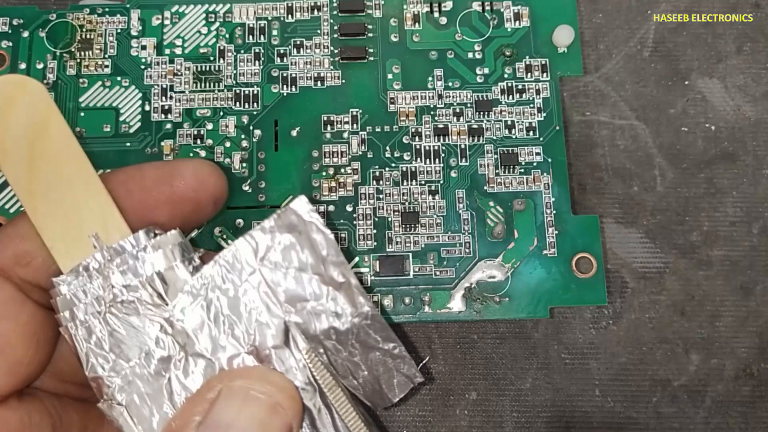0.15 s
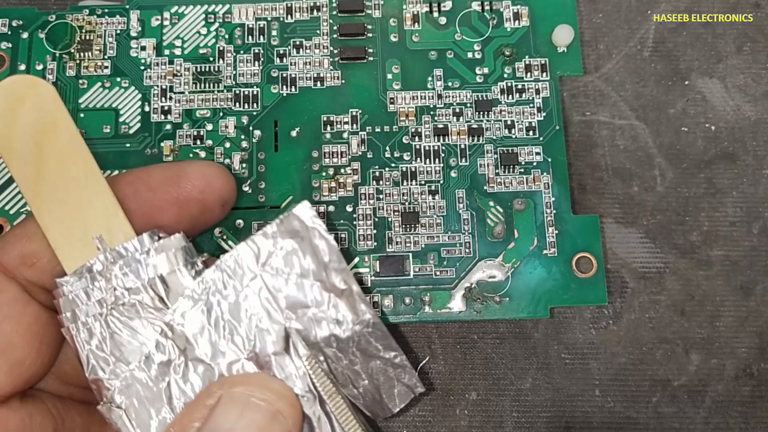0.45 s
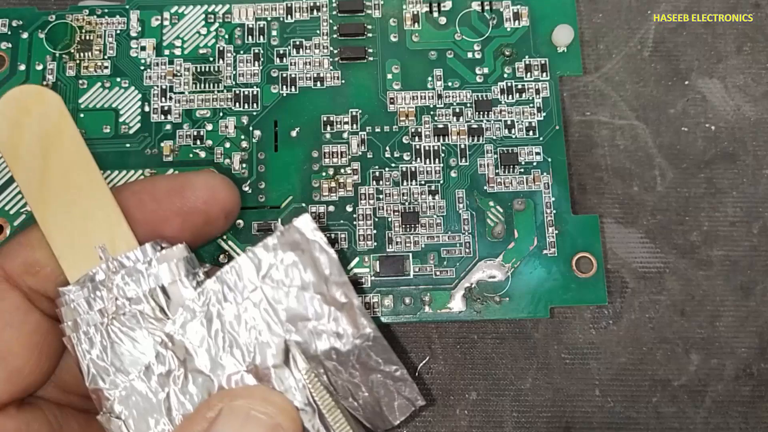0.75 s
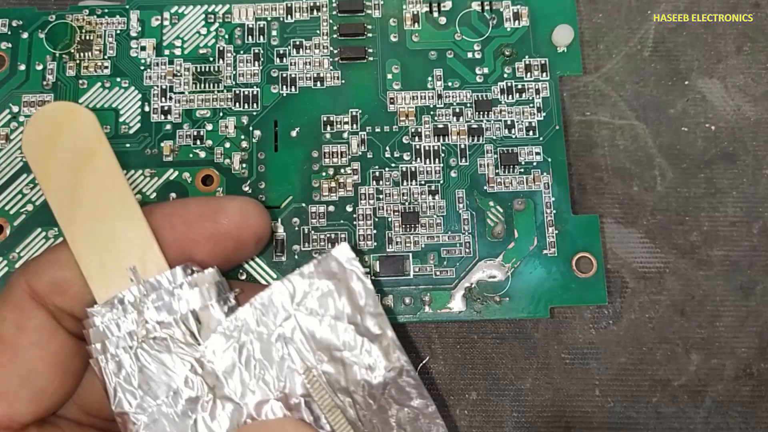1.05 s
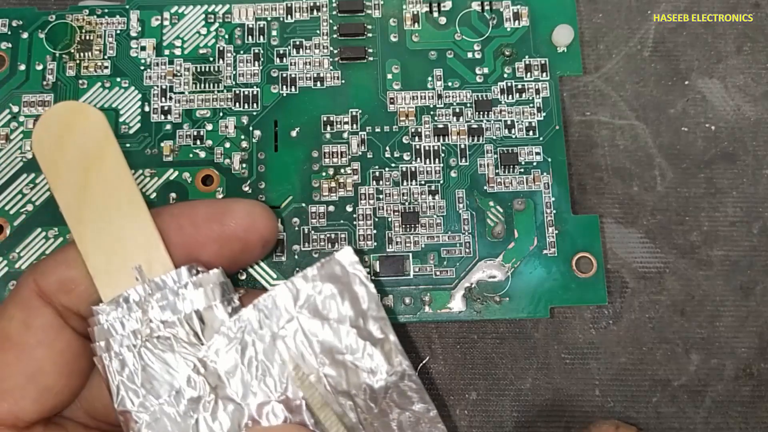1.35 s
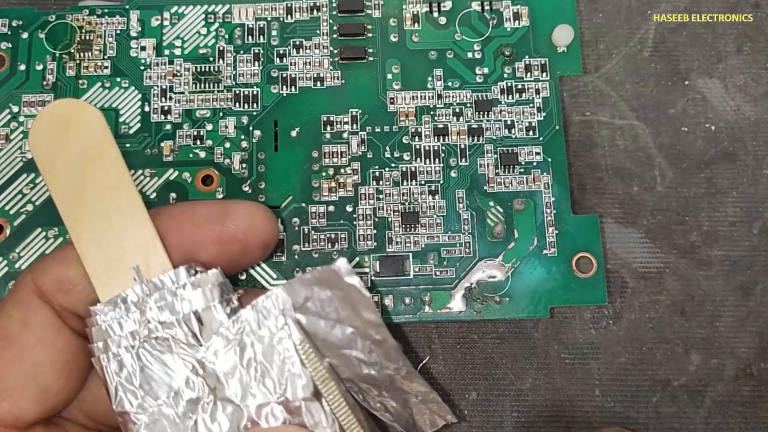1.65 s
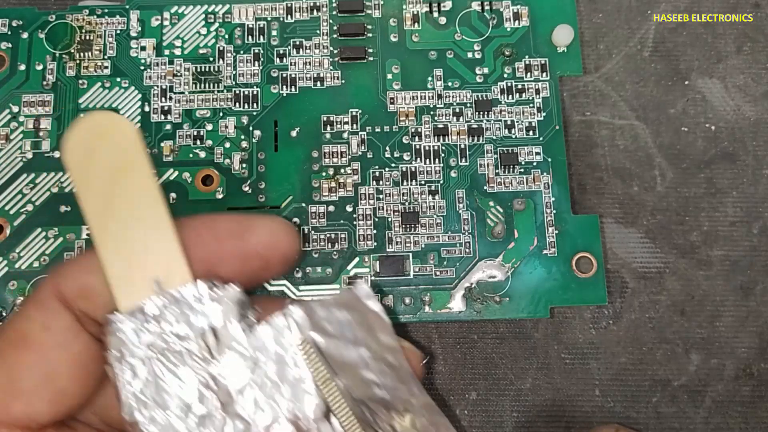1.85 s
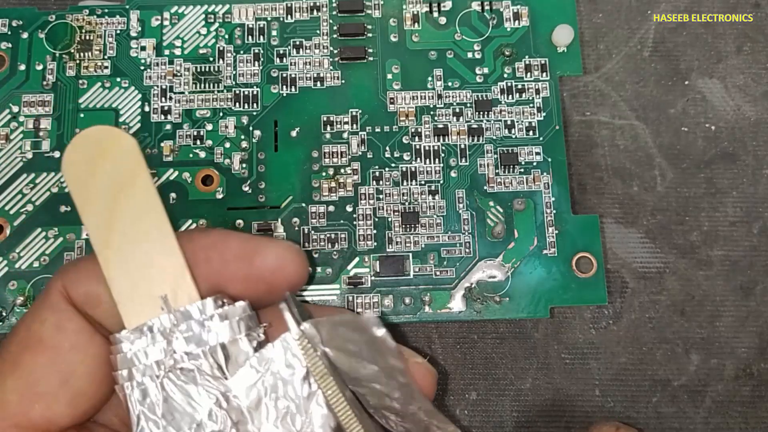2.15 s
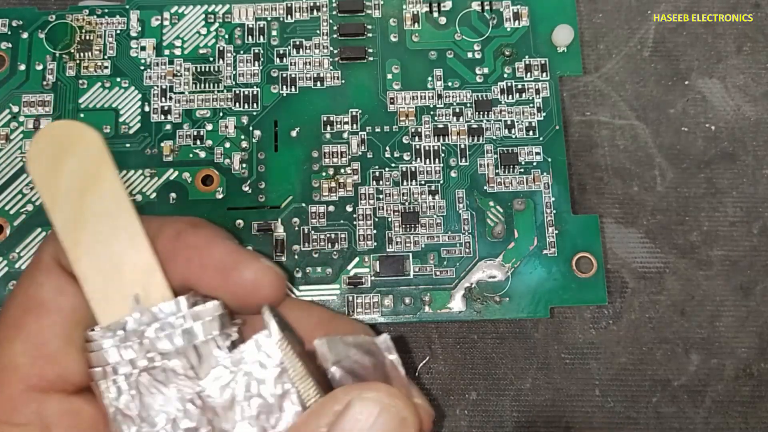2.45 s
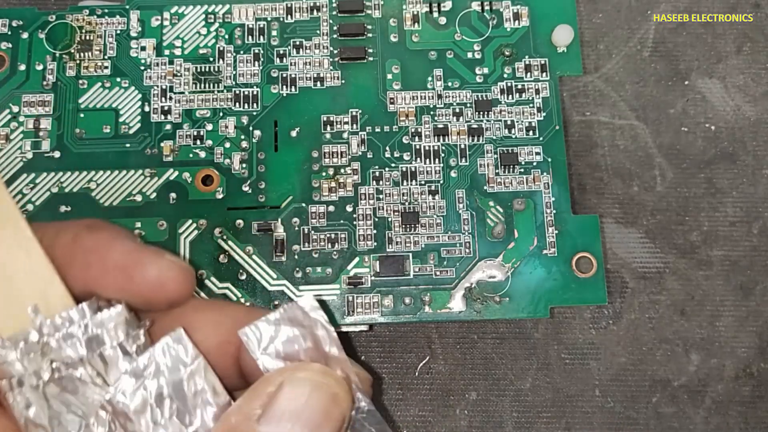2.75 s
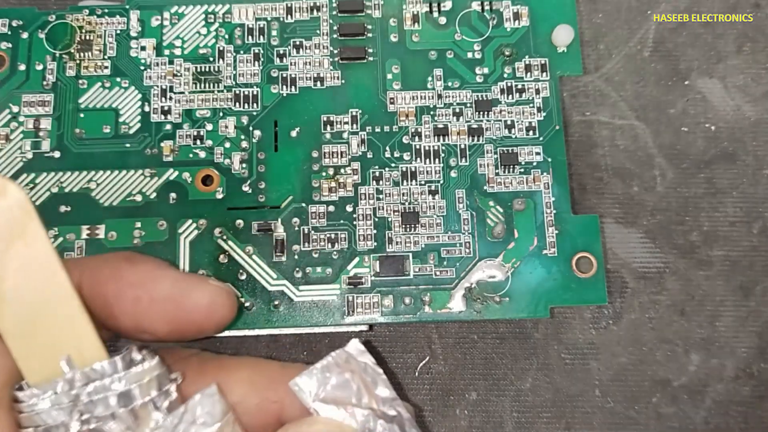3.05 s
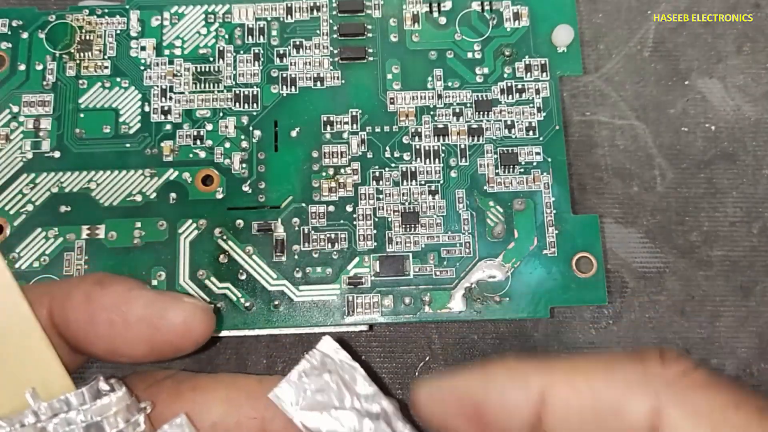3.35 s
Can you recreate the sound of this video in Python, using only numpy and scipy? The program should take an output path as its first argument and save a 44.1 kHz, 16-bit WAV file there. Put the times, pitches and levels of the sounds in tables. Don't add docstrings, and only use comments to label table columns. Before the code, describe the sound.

Crumpled foil crackles sharply as scissors cut it, then the scissors clatter onto the bench.

```python
import sys
import numpy as np
from scipy import signal
from scipy.fft import rfft, irfft, next_fast_len
from scipy.io import wavfile
from scipy.ndimage import uniform_filter1d, map_coordinates

SR = 44100
rng = np.random.default_rng(int(sys.argv[2]) if len(sys.argv) > 2 else 0)


def level_to_linear(level):
    exponent = np.asarray(level, float) / 20
    return 10 ** exponent


def wav_out(sig):
    wavfile.write(sys.argv[1], SR, np.round(np.clip(np.atleast_2d(sig).T, -1, 1) * 32767).astype(np.int16))


N = 154350
T = np.arange(SR // 4) / SR

# (frequency [Hz], density [dB per Hz])
FOIL_SPECTRUM = [(250, -48), (700, -2), (1100, -5), (2200, -3.5), (4000, -4.5), (8000, -2), (15500, -9)]


def unit(x):
    return x / np.sqrt(np.mean(x ** 2) + 1e-20)


def along(points, hz):
    f, v = np.transpose(points)
    return np.interp(np.log(hz + 1), np.log(f + 1), v)


def filtered(x, response):
    n = x.shape[-1]
    m = next_fast_len(n + 1024)
    return irfft(rfft(x, m) * response(np.fft.rfftfreq(m, 1 / SR)), m)[..., :n]


def wobble(rate_hz, size):
    knots = rng.standard_normal(int(size * 2000 / SR) + 4)
    return map_coordinates(knots, [np.arange(size) * min(rate_hz, 2000) / SR])


def fade(t60_s):
    return level_to_linear(-60 * T / t60_s)


def add(track, start_s, sound):
    part = track[..., round(start_s * SR):][..., :sound.shape[-1]]
    part += sound[..., :part.shape[-1]]


def pair(size):
    own_gain = 1
    shared, left, right = rng.standard_normal((3, size))
    return unit(shared + own_gain * np.array([left, right]))


def patchy(noise, spectrum, patch_db, tilt_db_oct):
    z = signal.stft(noise, nperseg=128)[2]
    field = uniform_filter1d(rng.standard_normal(z.shape[1:]), size=2, axis=0)
    field = uniform_filter1d(field, size=16, axis=1)
    x = signal.istft(z * level_to_linear(patch_db * unit(field)), nperseg=128)[1][:, :noise.shape[1]]
    colour = lambda hz: level_to_linear(along(spectrum, hz) + tilt_db_oct * np.log2(hz / 3000 + 0.24))
    return unit(filtered(x, colour))


def fan():
    # (frequency [Hz], density [dB per Hz])
    rush_spectrum = [(35, -0.5), (60, -2.5), (150, -1.5), (380, -7), (600, -11.5), (1100, -14),
                     (2500, -28.5), (6000, -32), (15500, -25)]
    # (frequency [Hz], level [dB rms])
    hum_tones = [(67, -58.5), (97, -63), (145, -64.5)]
    # (frequency [Hz], left-right correlation [-1..1])
    likeness = [(60, 0.88), (240, 0.82), (950, 0.18), (3770, -0.055), (15000, -0.39)]
    rush_db, patch_db, left_db = -51.5, 1.5, -0.78

    angle = lambda hz: np.arccos(np.clip(along(likeness, hz), -1, 1)) / 2
    rush = patchy(rng.standard_normal((2, N)), rush_spectrum, patch_db, 0)
    mid, side = filtered(rush, lambda hz: np.array([np.cos(angle(hz)), np.sin(angle(hz))]))
    t = np.arange(N) / SR
    hum = 0
    for hz, db in hum_tones:
        level = level_to_linear(db + 5.0 + 3.7 * wobble(11, size=N))
        hum = hum + level * np.sin(2 * np.pi * hz * t + 0.91 * wobble(12, size=N))
    air = level_to_linear(rush_db) * unit(np.array([mid + side, mid - side]))
    return (air + hum) * level_to_linear([[left_db], [-left_db]])


def scrape(start_s, rise_s, hold_s, level_db, tilt_db_oct):
    rise_db, t60_s, grit_db, patch_db = 15, 0.016, -2, 3.5
    swell_db = np.minimum(rise_db * (T / rise_s - 1), 0)
    decay_db = 60 * np.maximum(T - rise_s - hold_s, 0) / t60_s
    grit = level_to_linear(grit_db * wobble(891, size=len(T)) + 1.6 * wobble(79, size=len(T)))
    friction = patchy(pair(size=len(T)), FOIL_SPECTRUM, patch_db, tilt_db_oct)
    return level_to_linear(level_db + swell_db - decay_db) * unit(grit * friction)


def rustle():
    # (time [s], level [dB])
    handling = [(0, -56), (.49, -69), (.6, -46), (.8, -56), (1.0, -57.5), (1.2, -51.5), (1.45, -59.5),
                (1.65, -53), (1.82, -59), (2.0, -52), (2.16, -47.5), (2.42, -43.5), (2.62, -35),
                (2.73, -46.5), (2.95, -55), (3.12, -50), (3.2, -43.5), (3.5, -57.5)]
    # (start [s], rise [s], hold [s], level [dB], tilt [dB per octave])
    slides = [(0.51, 0.026, 0.0088, -28.5, -2.5), (0.574, 0.0076, 0.034, -41, 0.5),
              (0.828, 0.016, 0.056, -45.5, -4), (1.063, 0.0095, 0.044, -49, -2.5),
              (1.188, 0.0063, 0.064, -48, 2), (1.52, 0.019, 0.071, -35, 3.5),
              (2.029, 0.041, 0.0089, -34, 4.5), (2.201, 0.037, 0.016, -30, 1.5),
              (2.246, 0.013, 0.007, -23, 0), (2.274, 0.021, 0.028, -20.5, 6.5),
              (3.15, .005, 0.046, -70, -8), (3.292, 0.0089, 0.13, -40.5, 6.5),
              (3.459, 0.018, .03, -39, 1.4)]
    # (start [s], rise [s], hold [s], level [dB], tilt [dB per octave])
    rattle = (2.56, .03, .08, -38, -4)
    patch_db, tilt_db_oct = 2.5, -1.34

    s, db = np.transpose(handling)
    level_db = np.interp(np.arange(N) / SR, s, db)
    level_db = level_db + 1.52 * wobble(30.11, size=N) + 0.51 * wobble(680, size=N)
    out = level_to_linear(level_db) * patchy(pair(size=N), FOIL_SPECTRUM, patch_db, tilt_db_oct)
    for row in slides + [rattle]:
        add(out, row[0], scrape(*row))
    return out


def squeak():
    middles = [.518, .532, .553, .548, .587, .604, .649, .68, 1.07, 1.083, 1.082, 1.114, 1.213, 1.21, 1.243,
               1.525, 1.535, 1.55, 1.575, 1.565, 1.56, 1.595, 1.575, 2.216, 2.232, 2.25, 2.262, 2.263, 2.27,
               2.297, 2.307, 2.318, 2.55, 2.605, 3.3, 3.35, 1.85, 1.928, 1.19, 1.846]
    # (half length [s], level [dB], pitch [Hz], width [Hz])
    facets = [(.002, -34, 2540, 360), (0.0047, -24, 1960, 370), (0.013, -44.5, 910, 60),
              (0.0077, -39, 2900, 450), (.005, -40, 1660, 250), (0.0045, -42.5, 910, 220),
              (0.00307, -36.5, 1010, 160), (.008, -43.5, 830, 63), (0.0035, -42.5, 2500, 270),
              (0.0058, -45, 1700, 250), (0.0067, -42.5, 3700, 300), (0.0038, -50, 4300, 210),
              (0.0058, -49, 1100, 140), (0.0043, -44, 2470, 180), (.004, -55.5, 1200, 200),
              (0.00215, -37, 2460, 250), (0.0064, -42.5, 3500, 120), (0.023, -47, 1550, 190),
              (0.042, -48.5, 2600, 190), (.03, -51, 3600, 200), (0.04, -51, 4530, 110),
              (0.02, -47.5, 1000, 140), (0.028, -45, 7500, 460), (0.0038, -42.5, 2600, 200),
              (.008, -42, 1100, 80), (.014, -37.5, 1420, 370), (.008, -32.5, 3240, 270),
              (.007, -27, 7200, 550), (0.0031, -23.5, 1045, 160), (.003, -32.5, 2140, 150),
              (0.0034, -30, 2040, 130), (.005, -29, 2040, 100), (0.0056, -30.5, 1450, 100),
              (.009, -30, 1310, 120), (0.16, -57.5, 1730, 82), (.12, -60, 980, 81),
              (0.0089, -49, 3230, 360), (.003, -40, 2800, 180), (.006, -42, 540, 98),
              (0.0058, -36, 9600, 970)]

    out, t = np.zeros((2, N)), np.arange(SR // 2) / SR
    for middle_s, (half_s, db, hz, width_hz) in zip(middles, facets):
        resonance = lambda f: 1 / (1 + ((f - hz) / width_hz) ** 2)
        narrow = unit(filtered(pair(size=len(t)), resonance))
        swell = np.exp(-((t - 1.5 * half_s) / half_s) ** 4)
        add(out, middle_s - 1.5 * half_s, level_to_linear(db) * swell * narrow)
    return out


def ring(modes, rough, wobble_hz):
    spread_rad = 0.36
    out = 0
    for hz, db, t60_s in modes:
        level = level_to_linear(db + rng.normal(0, 2.3) + 3.6 * rough * wobble(wobble_hz, size=len(T)))
        phase = rng.uniform(0, np.pi) + spread_rad * rng.standard_normal((2, 1))
        phase = phase + rough * wobble(wobble_hz, size=len(T))
        out = out + level * fade(t60_s) * np.sin(2 * np.pi * hz * T + phase)
    return out


def scissors():
    # (time [s], thud [dB], knock [dB], ring [dB], crack [dB])
    contacts = [
        (2.4676, -21, -2.5, -52, -15.5),
        (2.5342, -22, -18, -31, -16),
        (2.549, -34, -18, -62, -32),
        (2.5694, -31, -35, -64, -21.5),
        (2.585, -22, -11.5, -18.5, -5),
        (2.592, -33.5, -24, -45, -16),
        (2.601, -40, -27, -51, -26),
        (2.6367, -29, -47, -50, -17.5),
    ]
    # (frequency [Hz], level [dB], t60 [s])
    bench = [(161.5, -9.5, 0.24), (249, -4, 0.13), (301, -7, 0.15), (361, -4.5, 0.14), (408.3, 0, 0.079),
             (527, -7, 0.092), (92.4, -9, 0.16)]
    # (frequency [Hz], level [dB], t60 [s])
    steel = [(1460, -14, 0.2), (7700, -18, .06), (8080, 5, 0.075), (11460, 4.5, 0.05), (11400, -24, 0.087)]
    knock_hz, knock_t60_s, knock_rise_s = 1040, 0.0089, 0.00097
    crack_hz, crack_t60_s = 4300, 0.012
    left_lag_s, left_db = 0.00022, -0.3

    out = np.zeros((2, N))
    for s, thud_db, knock_db, ring_db, crack_db in contacts:
        crack_band = lambda f: f / (f + 1500) / (1 + (f / crack_hz) ** 2)
        crack = unit(filtered(pair(size=len(T)), crack_band)) * fade(crack_t60_s)
        buzz = 0.14 * np.sin(4.4 * np.pi * knock_hz * T)
        knock = np.sin(-2 * np.pi * knock_hz * T + buzz) * fade(knock_t60_s)
        knock = knock * 3 * (1 - np.exp(-(T / knock_rise_s) ** 2))
        hit = level_to_linear(thud_db) * ring(bench, 0.92, 56) + level_to_linear(knock_db) * knock
        hit = hit + level_to_linear(ring_db) * ring(steel, 0.49, 408) + level_to_linear(crack_db) * crack
        add(out, s, (1 - np.exp(-T / 0.0001)) * hit)
    lag_s = np.array([[left_lag_s], [0]])
    return filtered(out, lambda f: np.exp(-2j * np.pi * f * lag_s)) * level_to_linear([[left_db], [-left_db]])


def snaps():
    # (time [s], peak [dB], body re peak [dB], sizzle re peak [dB],
    # body pitch [Hz])
    creases = [(0.522, -10.5, -34, -9.5, 878), (0.528, -13.5, -13, -9.5, 2020), (0.537, -17.5, -7, -4, 973),
               (0.583, -32, -12, -23, 1690), (0.6278, -17.5, -10.5, -11.5, 1270),
               (0.632, -5.5, -22, -26.5, 1210), (0.677, -35, -8.5, -15, 876), (0.873, -32.5, 0, -7, 1400),
               (0.877, -30, -4, -17, 1160), (1.069, -41, -6, -7, 1740), (1.079, -37, -30, 2.5, 1650),
               (1.113, -38, -21, -3, 1710), (1.185, -14.5, -11, -17, 1010), (1.277, -34, -34, -2, 2750),
               (1.522, -32, -11.5, -2, 1500),
               (1.8385, -18, -20.5, -5, 735), (1.843, -29.5, -11, -22, 1240), (1.925, -19.5, -34, -7, 2650),
            (1.931, -33.5, -11.5, -2, 1130), (1.9706, -18.5, -12.5, -3.5, 1024),
            (2.032, -40.5, -19, -2, 794), (2.061, -28, -17, -9, 1040), (2.186, -26.5, -24, -4.5, 945),
            (2.267, -9, -13, -4, 2610), (3.046, -26, -13, -7, 2080), (3.048, -29, -13, -5, 1020),
            (3.094, -19.5, -13.5, -8, 1120), (3.147, -13.5, -14.5, -5, 1800), (3.153, -16, -12, -13, 1930),
            (3.384, -28.5, -15, -5.5, 947), (3.408, -28, -22, -6.5, 1800), (3.451, -27, -9.5, -10.5, 1010),
               (.5222, -11, -0.5, -48, 9200), (.5385, -22, -7, -22, 2480), (0.51, -33, -16, -21, 2800),
            (1.185, -22, -8.5, -26, 465), (0.49, -30.5, -21, -14, 1080), (1.159, -37, -7, -6, 930),
            (1.1845, -22.5, -12.5, -17, 1710), (2.4, -28, -21, -2, 940), (.636, -22, -6.5, -13.5, 1200)]
    snap_t60_s, body_t60_s, tail_t60_s = 0.011, 0.012, 0.08
    body_gain_db, sizzle_gain_db, tail_db, bands_db = 7, 8, -16, 3.5

    out, n = np.zeros((2, N)), SR // 8
    for s, db, body_db, sizzle_db, hz in creases:
        panel_band = lambda f: f / hz / (1 + ((f - hz) / (0.75 * hz)) ** 2)
        panel = unit(filtered(pair(size=n), panel_band))
        body = np.sin(2 * np.pi * hz * T[:n] + rng.normal(0, 0.76, (2, 1))) + 0.5 * panel
        bands = bands_db * rng.standard_normal(24)
        bands_at = lambda f: np.interp(f, np.linspace(0, SR / 2, len(bands)), bands)
        colour = lambda f: level_to_linear(along(FOIL_SPECTRUM, f) + bands_at(f)) * f / (f + 3000)
        bright = level_to_linear(sizzle_db + sizzle_gain_db) * unit(filtered(pair(size=n), colour))
        snap = level_to_linear(body_db + body_gain_db) * body * fade(body_t60_s)[:n]
        snap = snap + bright * fade(snap_t60_s)[:n]
        shiver = level_to_linear(tail_db) * fade(tail_t60_s)[:n] * (bright + level_to_linear(body_db) * panel)[:, ::-1]
        add(out, s, level_to_linear(db) * (1 - np.exp(-T[:n] / 0.00034)) * (snap + shiver))
    return out


def room(x):
    # (frequency [Hz], t60 [s])
    decay = [(200, 1), (1500, 0.46), (10000, 0.3)]
    tail_db, left_db, left_lag_s = -14, -0.78, 0.00011

    hz, t, z = signal.stft(rng.standard_normal((2, SR // 2)), SR, nperseg=256)
    tail = signal.istft(z * level_to_linear(-60 * t / along(decay, hz)[:, None]), SR, nperseg=256)[1]
    tail = np.pad(tail, ((0, 0), (300, 0)))
    tail = tail / np.linalg.norm(tail, axis=1, keepdims=True)
    far = signal.fftconvolve(x, tail, axes=1)[:, :N]
    side = np.array([[1], [-1]])
    direct = filtered(x, lambda f: np.exp(-1j * np.pi * f * left_lag_s * side))
    return level_to_linear(left_db * side) * (direct + level_to_linear(tail_db) * far)


def scene():
    return room(snaps() + scissors() + rustle() + squeak()) + fan()


def roll_off(x):
    return signal.sosfilt(signal.butter(12, 16810, fs=SR, output="sos"), x)


def record(dry):
    # (frequency [Hz], gain [dB])
    microphone = [(4500, 1.5), (5700, -5), (6600, -1), (7400, 0), (9000, -7.5), (10000, -8.5),
                  (14000, -2.5), (15800, -2)]
    low_cut_hz, top_hz, start_s = 47.5, 15900, 0.011

    low_cut = lambda f: (1j * f / (low_cut_hz + 1j * f)) ** 4
    response = lambda f: level_to_linear(along(microphone, f)) * low_cut(f) * np.where(f < top_hz, 1, 0.1)
    heard = filtered(dry, response) * (np.arange(N) > start_s * SR)
    return roll_off(np.clip(heard, -1, 1))


dry = scene()
out = record(dry)
wav_out(out)
```